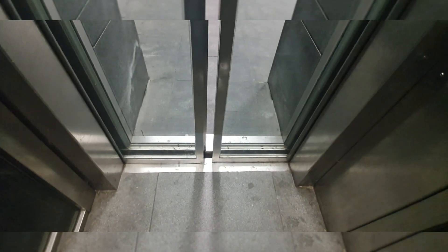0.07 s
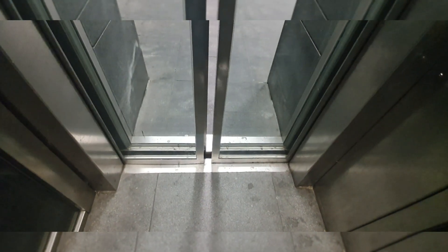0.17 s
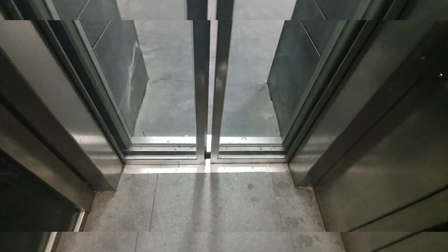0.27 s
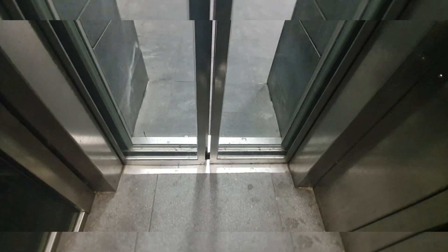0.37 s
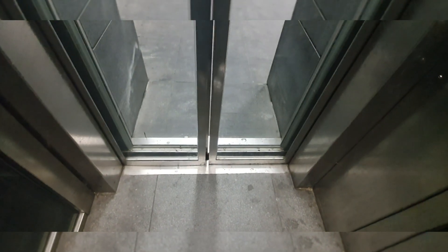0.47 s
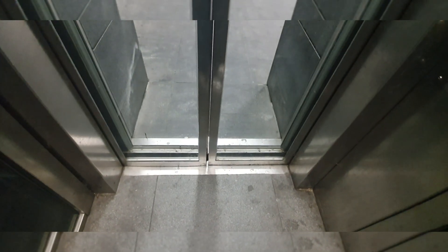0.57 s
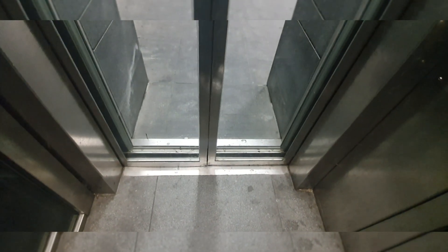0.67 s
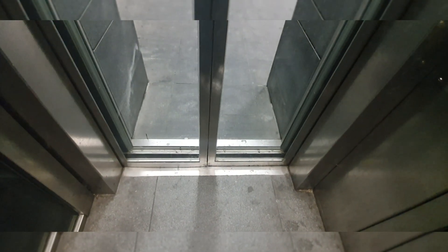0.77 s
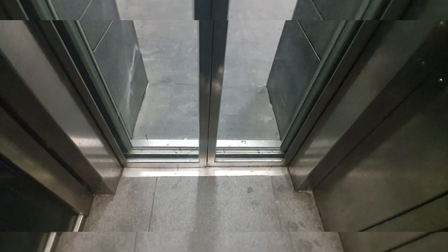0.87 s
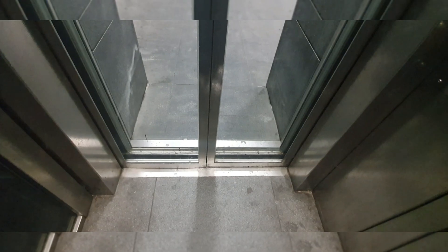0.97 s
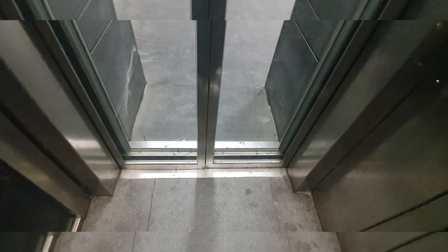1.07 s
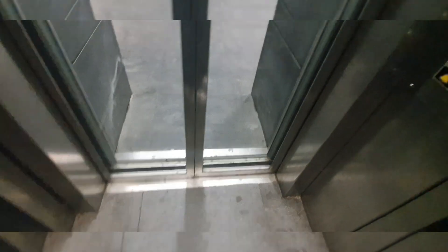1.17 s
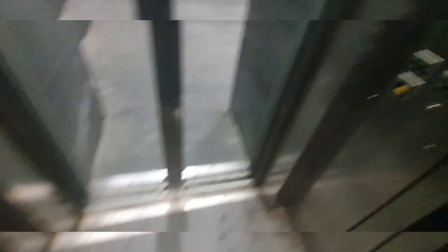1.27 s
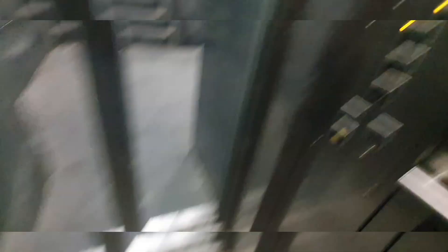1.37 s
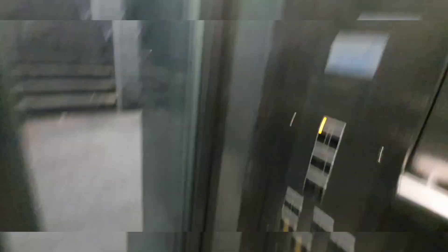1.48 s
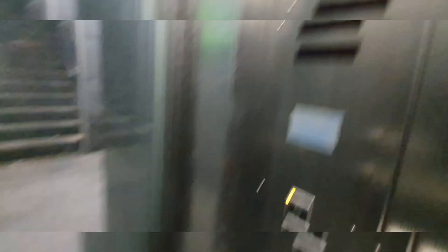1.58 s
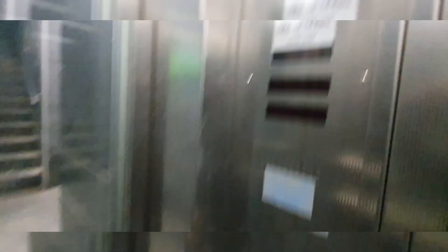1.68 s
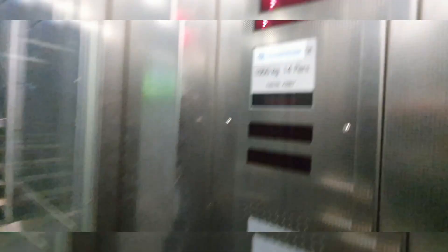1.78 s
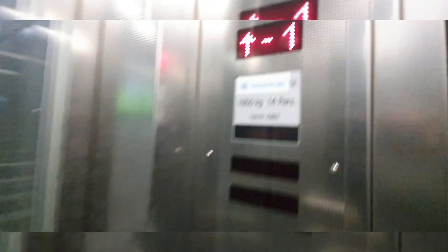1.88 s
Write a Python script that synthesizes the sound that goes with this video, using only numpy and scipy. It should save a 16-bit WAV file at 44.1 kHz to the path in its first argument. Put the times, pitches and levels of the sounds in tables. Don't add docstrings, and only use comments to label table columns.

```python
import sys
import numpy as np
from scipy import signal
from scipy.fft import rfft, irfft
from scipy.io import wavfile

SR = 44100
rng = np.random.default_rng(int(sys.argv[2]) if len(sys.argv) > 2 else 0)


def transcribe(u):
    v = np.clip(np.atleast_2d(u).T, -1, 1)
    q = np.round(v * 32767).astype(np.int16)
    wavfile.write(sys.argv[1], SR, q)


def gain_from_decibels(decibels):
    exponent = np.asarray(decibels, float) / 20
    return 10 ** exponent


N = 83790

# start in seconds, level into the panels in dB, clatter level in dB,
# clatter tilt in dB per octave, rise in seconds.
DOOR_BLOWS = [
    (0.193, -33.5, -45, 3, 0.0051),
    (0.214, -31.5, -39, -1, 0.0082),
    (.262, -29.5, -42, 0.5, 0.014),
    (0.3409, -23.5, -40, 8, .002),
    (0.4098, -14, -29, 3, .003),
    (.445, -20.5, -48.5, 8, 0.0035),
    (.505, -21.5, -59, -11, .008),
    (0.671, -29.5, -53, 6.5, 0.002),
    (.683, -27.5, -44, -4.5, 0.00795),
    (.705, -26.5, -57, 5.5, .008),
]


def rms_one(x):
    return x / np.sqrt(np.mean(x ** 2) + 1e-20)


def in_time(rows):
    s, *columns = np.transpose(rows)
    return [np.interp(np.arange(N) / SR, s, c) for c in columns]


def at_hz(points, hz):
    table_hz, values = np.transpose(points)
    return np.interp(np.log(hz), np.log(table_hz), values)


def drift(rate):
    r = np.exp(-80 * np.pi * rate / SR)
    slow = signal.lfilter([1], [1, -2 * r, r * r], rng.standard_normal(N // 40 + 2002))[2000:]
    return np.interp(np.arange(N) / 40, np.arange(len(slow)), rms_one(slow))


def ring(clicks, hz, t60):
    r = 1000 ** (-1 / (t60 * SR))
    w = 2 * np.pi * hz / SR
    return signal.lfilter([0, np.sin(w)], [1, -2 * r * np.cos(w), r * r], clicks + 1e-18)


def dying(start, rise, t60):
    t = np.maximum(np.arange(N) / SR - start, 0)
    return (1 - np.exp(-t / max(rise, 1e-4))) * np.exp(-np.log(1000) * t / t60)


def sides(hz):
    # frequency in Hz, left minus right in dB.
    balance = [(60, -3), (110, -2), (200, -2.5), (380, -4), (700, -1.5), (1290, -1), (2380, -2.5),
               (4400, 1), (8120, 0.5), (15000, -21.5)]
    return gain_from_decibels(at_hz(balance, hz) * np.array([[.5], [-.5]]))


def banded(gain_of_band, patchy_db):
    # frequency in Hz, share of sound common to both sides.
    likeness = [(60, 0.99), (250, 0.77), (1000, 0.0095), (3000, 0.18), (6000, .02)]
    out, together, edges = 0, drift(8), np.geomspace(25, 16300, 24)
    white = rng.standard_normal((2, 2, N))
    for k, (low, high) in enumerate(zip(edges, edges[1:])):
        band = signal.butter(2, [low, high], "band", fs=SR, output="sos")
        mid, side = signal.sosfilt(band, white[k % 2])
        hz = np.sqrt(low * high)
        alike = np.clip(at_hz(likeness, hz), -1, 1)
        gain = gain_of_band(hz) * gain_from_decibels(patchy_db * (0.84 * together + drift(9.7)))
        stereo = np.sqrt(1 + alike) * mid + np.sqrt(1 - alike) * side * [[1], [-1]]
        out = out + gain * sides(hz) * stereo
    return out


def swelling(swells):
    out, t = 0, np.arange(N) / SR
    wobble = np.cumsum(1 + .03 * drift(10)) / SR
    for start, length, hz, db in swells:
        swell = np.sin(np.pi * np.clip((t - start) / length, 0, 1))
        out = out + gain_from_decibels(db) * swell * np.sin(2 * np.pi * hz * wobble) * sides(hz)
    return np.sqrt(2) * out


def panels():
    # frequency in Hz, level in dB, t60 in seconds.
    panel_modes = [(157.4, -3, 0.47), (181.3, -6.5, 0.42), (302, -21, 0.96), (333.1, -8.5, 0.25),
                   (400.6, -20, 0.58), (488, -24, 0.24), (539, -20, 0.16), (876, -17, 0.081),
                   (1085, -26.5, 0.082), (2420, -37, 0.14)]
    push_s, touches_per_s = 0.026, 500
    touches = (rng.random(N) < touches_per_s / SR) * rng.standard_normal(N) * .5
    chance, out = rng.standard_normal((len(DOOR_BLOWS), len(panel_modes))), 0
    for k, (hz, mode_db, t60) in enumerate(panel_modes):
        clicks = np.zeros(N)
        for (s, db, _, _, rise), luck in zip(DOOR_BLOWS, chance[:, k]):
            strength = gain_from_decibels(db + mode_db + 2.5 * luck) * np.sign(luck)
            clicks += strength * np.roll(touches, 997 * k) * dying(s, rise, push_s * np.log(1000))
            clicks[int((s + rise) * SR)] += strength
        out = out + ring(clicks, hz, t60) * sides(hz)
    return out


def clatter():
    # frequency in Hz, level in dB per Hz.
    colour = [(100, -11), (250, -2), (450, 8.5), (900, 5.5), (2300, 0), (5000, -9), (9000, -18.5),
              (15500, -33)]
    # frequency in Hz, t60 in seconds.
    decay = [(150, 1.51), (500, 0.7), (1500, 0.55), (4000, 0.48), (9000, 0.47), (14000, 0.51)]
    crack_db, crack_t60_s = 3.5, 0.034

    def gain(hz):
        t60, power = at_hz(decay, hz), 0
        for s, _, db, tilt, rise in DOOR_BLOWS:
            crack = gain_from_decibels(crack_db) * dying(s, rise * 0.64, crack_t60_s)
            level = gain_from_decibels(db + tilt * np.log2(hz / 2000))
            power = power + (level * (dying(s, rise, t60) + crack)) ** 2
        return np.sqrt(power) * gain_from_decibels(at_hz(colour, hz) - at_hz(colour, 2000) + 7)
    return banded(gain, patchy_db=-1.0)


def latch():
    mode_hz = [2800, 3520, 4958, 5752, 5997, 6071, 6366, 6584, 6783, 7086, 7279, 10800, 13240, 14840]
    # level in dB, t60 in seconds.
    mode_decay = [(-23, 0.067), (-14, 0.39), (-15.5, 1), (-6.5, 1), (-6, 1), (-8.5, 0.41), (-13, .2),
                  (-1.5, 0.4), (-12, 0.22), (-10, 0.4), (-3.5, 0.14), (-13.5, 0.31), (-15.5, 0.15),
                  (-21, 0.16)]
    snap_s, snap_db, chatter_s, hiss_db = .3403, -21, 0.0071, -27
    damped_s, damp_db, damp_db_per_s = .405, -10, -70
    out, t = 0, np.arange(N) / SR
    for hz, (db, t60) in zip(mode_hz, mode_decay):
        chatter = rng.standard_normal((2, N)) * dying(snap_s, 0.00051, chatter_s * np.log(1000)) * 0.038
        chatter[[0, 1], int(snap_s * SR) + np.array([0, 2])] += 1
        steady = 4000 < hz < 9000
        flutter = 1 + .2 * drift(40) if steady else drift(150)
        out = out + flutter * ring(chatter, hz, t60) * gain_from_decibels(snap_db + db) * sides(hz)
    since = np.maximum(t - damped_s, 0)
    out = out * gain_from_decibels(damp_db * np.minimum(since / 0.022, 1) + damp_db_per_s * since)
    band = signal.butter(4, [5650, 7500], "band", fs=SR, output="sos")
    dense = signal.sosfilt(band, rng.standard_normal((2, N)))
    decay = dying(snap_s, 0.0024, 0.27)
    decay = decay + 0.44 * dying(snap_s + 0.013, .004, 0.2)
    decay = decay + 0.064 * dying(snap_s, 0.012, 0.55)
    return out + gain_from_decibels(hiss_db) * rms_one(dense) * decay


def rebound():
    # frequency in Hz, level in dB, t60 in seconds.
    rebound_modes = [(9000, -6, .3), (9179, -13.5, .2), (11500, 2.5, 0.2), (13600, -10, .15),
                     (14680, -2, 0.095)]
    out = 0
    for hz, db, t60 in rebound_modes:
        chatter = rng.standard_normal((2, N)) * dying(.443, .001, 0.015) * .1
        out = out + (1 + 0.44 * drift(80)) * ring(chatter, hz, t60) * gain_from_decibels(-41.5 + db) * sides(hz)
    return out


def ticks():
    # start in seconds, level in dB, frequency in Hz, t60 in seconds.
    contacts = [(.4103, -23, 2200, .01), (.4106, -26, 3800, .006), (.4115, -31, 900, .03),
                (0, -36, 1500, .002), (.0002, -40, 5000, .001), (.682, -33, 1150, .035),
                (.6835, -35, 800, .03), (.685, -37, 1500, .03), (1.6955, -34, 1900, .007),
                (1.696, -41, 1000, .003), (1.892, -33, 2600, .002), (1.893, -37, 620, .01)]
    out = np.zeros(N)
    for s, db, hz, t60 in contacts:
        click = np.zeros(N)
        click[int(s * SR)] = gain_from_decibels(db)
        out += ring(click, hz, t60)
    return signal.lfilter([.5], [1, -.5], out)


def panes():
    # frequency in Hz, level in dB, t60 in seconds.
    glass_modes = [(183.4, -25.5, 1.625), (234.7, -19, 1.09), (158.3, -38, 0.46), (340.2, -19.5, 1.2)]
    # start in seconds, level in dB.
    pushes = [
        (0.237, -9.5),
        (.415, 4),
        (0.508, -9),
        (.70, -11),
    ]
    clicks = sum(gain_from_decibels(db) * dying(s, 0.0034, 0.013) for s, db in pushes)
    clicks = clicks / dying(0, 0.0034, 0.0079).sum()
    return sum(ring(clicks, hz, t60) * gain_from_decibels(db) * sides(hz) for hz, db, t60 in glass_modes)


def buzz():
    # start in seconds, end in seconds, first frequency in Hz, last frequency in Hz, level in dB.
    tones = [
        (0.2025, .318, 664, 640, -37.5),
        (0.28, .398, 626, 648, -30.5),
        (0.37, .41, 175, 178, -18.5),
        (.343, 0.37, 400, 345, -27.5),
        (-0.39, 0.29, 170, 156, -47.5),
        (.26, .3, 405, 400, -34),
    ]
    out, t = 0, np.arange(N) / SR
    for start, end, first_hz, last_hz, db in tones:
        share = (t - start) / (end - start)
        held = np.clip(share, 0, 1)
        gate = np.clip(np.minimum(share, 1 - share) / 0.016, 0, 1)
        gate = gate * gain_from_decibels(db - 1.4 * held + 2.2 * drift(32))
        hz = (first_hz + (last_hz - first_hz) * held) * (1 + 0.0048 * drift(33))
        out = out + gate * np.sin(2 * np.pi * np.cumsum(hz) / SR) * sides(first_hz)
    return out


def leaf_flex():
    # start in seconds, length in seconds, frequency in Hz, peak rms in dB.
    bends = [(0.31, 0.084, 140, -34.5), (.225, 0.077, 340, -33), (0.281, .05, 176, -32.5),
             (.41, 0.051, 410, -34.5), (.43, 0.058, 172, -19), (.474, 0.039, 182, -23),
             (0.42, 0.017, 339, -35), (0.52, 0.032, 890, -35), (0.52, 0.012, 1400, -44),
             (0.41, 0.031, 880, -45), (.69, .07, 318, -34.5), (0.5, 0.073, 159.3, -26.5),
             (0.33, 0.075, 540, -38)]
    return swelling(bends)


def floor_shudder():
    # start in seconds, length in seconds, frequency in Hz, peak rms in dB.
    heaves = [(0, 0.092, 39.4, -33), (0.043, 0.16, 88.1, -36.5), (0.197, 0.091, 80.2, -27.5),
              (.29, 0.1, 81.3, -33), (0.384, 0.1, 85, -19), (0.494, 0.14, 87, -19), (.66, 0.1, 66, -33),
              (0.77, 0.051, 75, -20.5), (.85, 0.14, 62, -43), (.97, .16, 72, -39.5),
              (1.14, 0.22, 75.3, -52), (1.29, 0.13, 76, -50), (1.44, 0.14, 71.1, -50.5),
              (1.61, .05, 90.9, -37.5), (1.665, 0.061, 93, -32), (1.715, 0.088, 91, -28.5),
              (1.828, 0.031, 95.9, -31.5), (1.858, .04, 92, -31)]
    return swelling(heaves)


def squeak():
    start_s, end_s = .98, 1.15
    share = (np.arange(N) / SR - start_s) / (end_s - start_s)
    band = signal.butter(2, (5150, 5500), "band", fs=SR, output="sos")
    air = signal.sosfilt(band, rng.standard_normal((2, N)))
    gate = np.clip(np.minimum(share, 1 - share) * 10, 0, 1)
    return gain_from_decibels(-83 + 8 * np.clip(share, 0, 1) + 2 * drift(20)) * gate * rms_one(air)


def finger():
    # start in seconds, length in seconds, frequency in Hz, peak rms in dB.
    shifts = [
        (1.54, .04, 75.6, -30),
        (1.578, 0.019, 160.1, -26.5),
        (1.595, .04, 72.9, -32),
    ]
    left_db = -29
    return swelling(shifts) * gain_from_decibels([[left_db], [0]])


def knocks():
    # start in seconds, level in dB, frequency in Hz, t60 in seconds.
    bumps = [
        (1.78, -51.5, 390, 0.071),
        (1.82, -50.5, 615, 0.044),
        (1.697, -44, 365, 0.012),
    ]
    out = np.zeros(N)
    for s, db, hz, t60 in bumps:
        click = np.zeros(N)
        click[int(s * SR)] = gain_from_decibels(db)
        out += ring(ring(click, hz, t60), hz, t60) * np.e * np.log(1000) * 2 / (t60 * SR)
    return out


def rustle():
    # time in seconds, effort in dB.
    effort = [(1.215, -62), (1.3, -62), (1.35, -63.5), (1.45, -67), (1.53, -62), (1.6, -59), (1.8, -56.5),
              (1.9, -54)]
    # frequency in Hz, level in dB per Hz.
    colour = [(120, -16), (200, -14), (300, -16), (400, -8.5), (564, -16), (812, -13.5), (6590, -23),
              (13600, -35.5), (15500, -42.5)]
    db, = in_time([(effort[0][0] - .045, -95)] + list(effort))
    hiss = rms_one(banded(lambda hz: gain_from_decibels(at_hz(colour, hz)), patchy_db=1.1))
    return gain_from_decibels(db + 6.5) * (db > -95) * hiss


def background():
    # frequency in Hz, level in dB per Hz.
    colour = [(15, -32), (25, -13.5), (91, -2), (119, -24), (183, -17.5), (2300, -51), (5280, -52),
              (8580, -58.5), (13500, -65), (15500, -65)]
    # time in seconds, level in dB.
    rumble_level = [(0, -41), (.15, -46), (.4, -28), (.9, -41), (1.15, -45.5), (1.5, -57.5), (1.6, -43.5),
                    (1.9, -39.5)]
    db, = in_time(rumble_level)
    whine = gain_from_decibels(-72.5 + 3.5 * drift(4.2)) * np.sin(2 * np.pi * 15690 * np.arange(N) / SR)
    return gain_from_decibels(db) * rms_one(banded(lambda hz: gain_from_decibels(at_hz(colour, hz)), patchy_db=-2.5)) + whine


def car(x):
    t60_s, wall_cut_hz = .4, 4400
    out, dull = np.zeros((2, N)), np.exp(-2 * np.pi * wall_cut_hz / SR)
    lags = (rng.uniform(.008, .025, 12) * SR).astype(int)
    for k, lag in enumerate(lags):
        loop, gain, state = x.copy(), gain_from_decibels(-60 * lag / SR / t60_s), [0.]
        for i in range(lag, N, lag):
            back, state = signal.lfilter([gain * (1 - dull)], [1, -dull], loop[i - lag:i], zi=state)
            loop[i:i + lag] += back[:N - i]
        out[k % 2] += (loop - x) * (-1) ** (k // 2)
    return out


def scene():
    struck = panels() + latch() + rebound() + buzz() + ticks()
    reverberant = gain_from_decibels(-20) * car(struck.mean(axis=0))
    close = knocks() * sides(150) + panes() + floor_shudder() + leaf_flex() + finger()
    return struck + reverberant + close + squeak() + clatter() + rustle() + background()


def top_cut(x):
    return signal.sosfilt(signal.butter(12, 16830, fs=SR, output="sos"), x)


def record(dry):
    # frequency in Hz, microphone gain in dB.
    response = [(5000, 0), (6500, 4), (7200, 2), (7900, -6), (9200, 3), (10300, -4), (13000, -1),
                (15700, -2)]
    hz = np.arange(1, N // 2 + 2) * SR / N
    top_step = -26 * (hz > 15800)
    low_cut = -10 * np.log10(1 + (38 / hz) ** 2)
    hollow = -1.5 * np.exp(-(np.log(hz / 120.6) / 0.23) ** 2)
    colour = at_hz(response, hz) + top_step + low_cut + hollow
    mix = irfft(rfft(dry) * gain_from_decibels(colour), N)
    return top_cut(mix)


dry = scene()
out = record(dry)
transcribe(out)
```